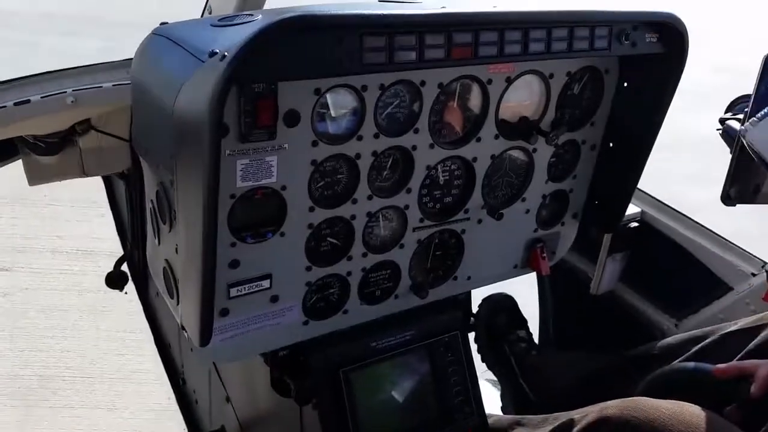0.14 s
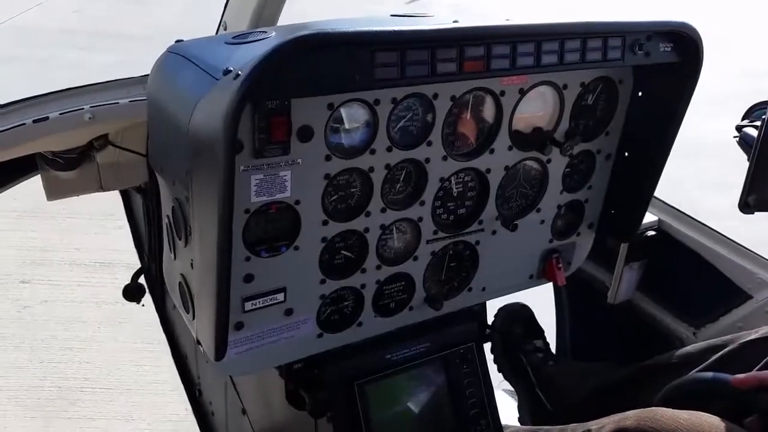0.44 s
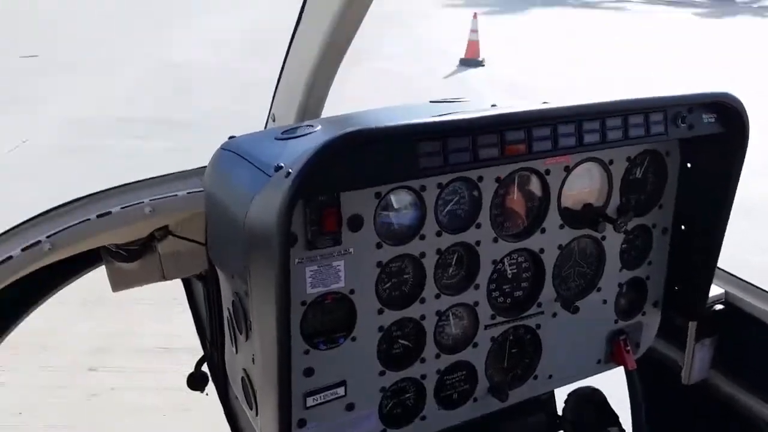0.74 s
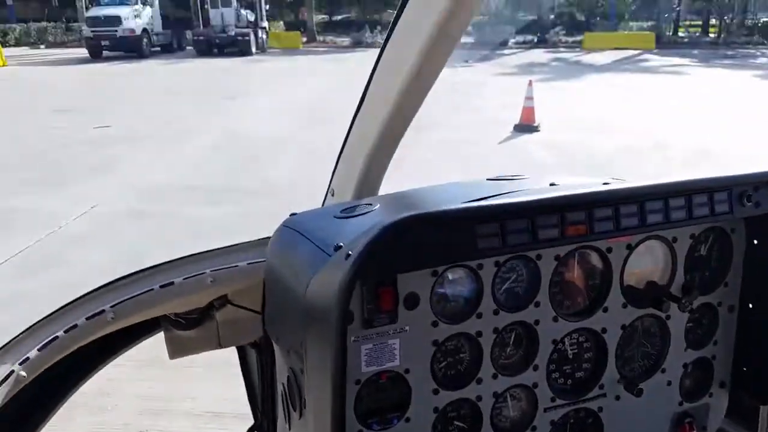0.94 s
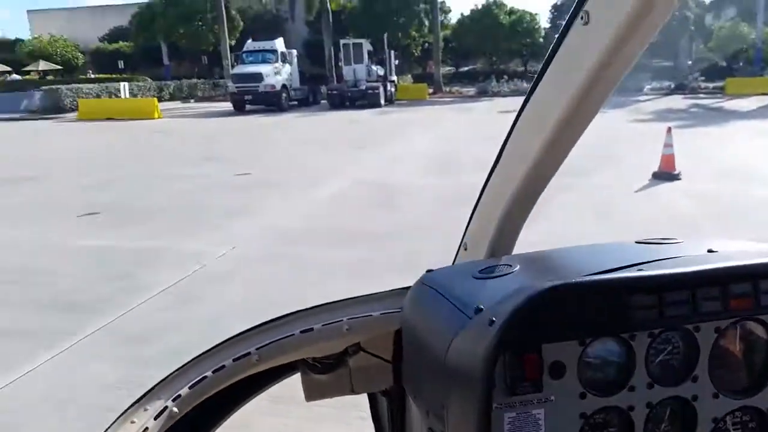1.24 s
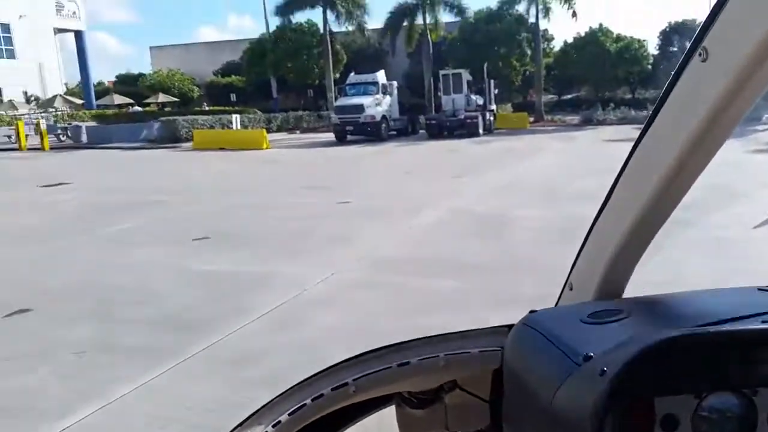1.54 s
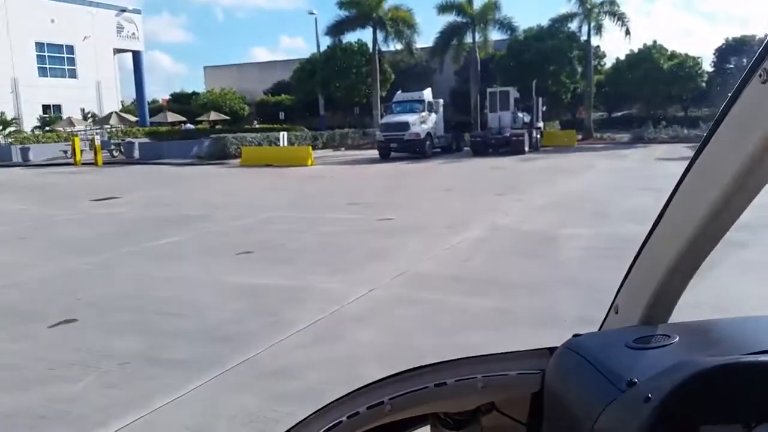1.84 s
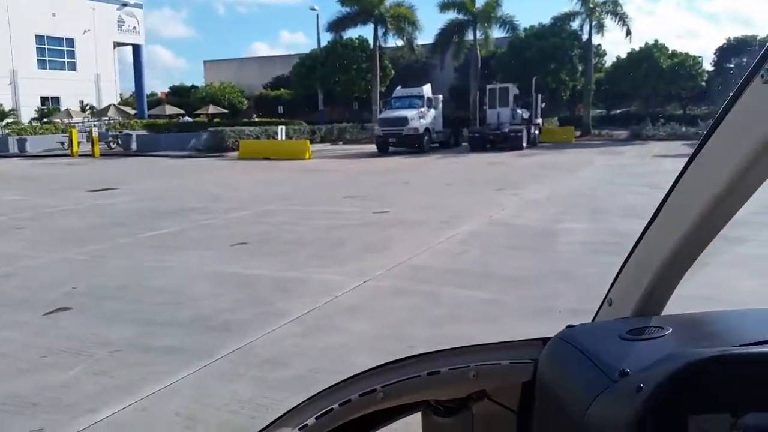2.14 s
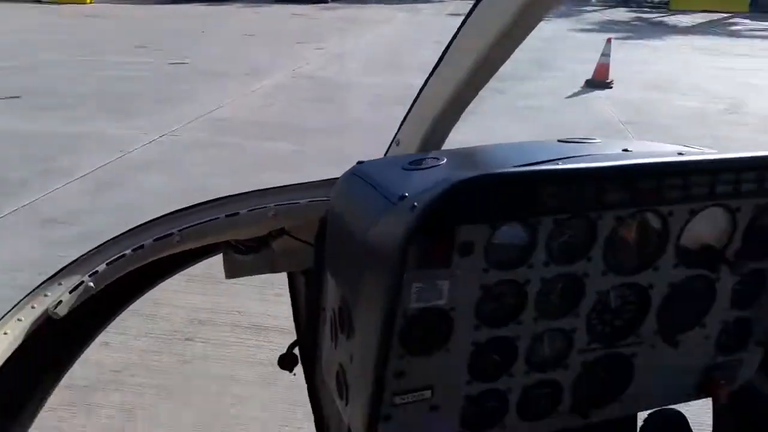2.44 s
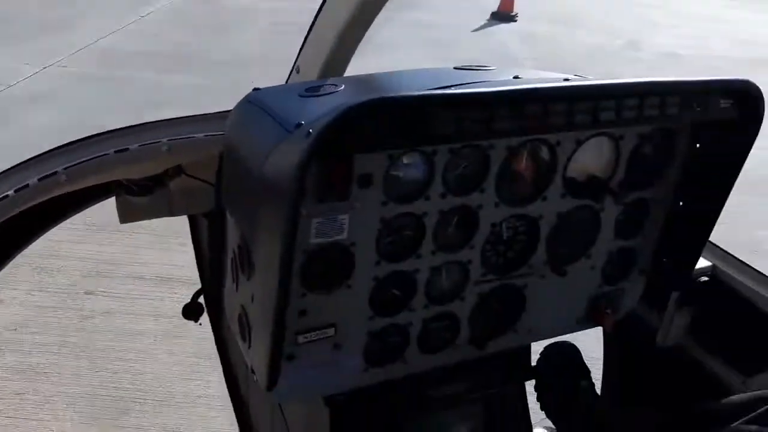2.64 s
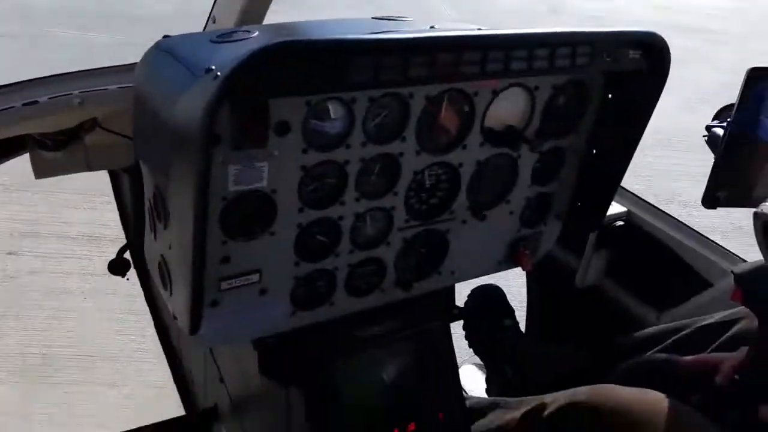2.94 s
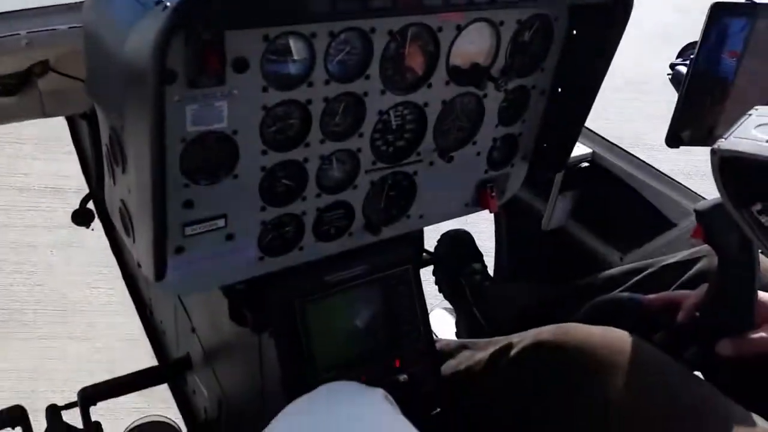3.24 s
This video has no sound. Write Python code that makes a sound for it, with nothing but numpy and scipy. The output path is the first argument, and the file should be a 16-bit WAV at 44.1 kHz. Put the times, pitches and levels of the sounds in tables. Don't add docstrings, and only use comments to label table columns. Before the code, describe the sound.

A turbine helicopter idles on the ground, piercing steady whine over low rumble, heard inside the cockpit

```python
import sys
import numpy as np
from scipy import signal
from scipy.fft import rfft, irfft
from scipy.io import wavfile

SR = 44100
rng = np.random.default_rng(int(sys.argv[2]) if len(sys.argv) > 2 else 0)


def gain_from_decibels(decibels):
    exponent = np.asarray(decibels, float) / 20
    return 10 ** exponent


def to_wav(sig):
    pcm = np.clip(np.atleast_2d(sig), -1, 1) * 32767
    pcm = np.round(pcm).astype(np.int16)
    wavfile.write(sys.argv[1], SR, pcm.T)


N = 149940
T = np.arange(N) / SR
BLADE_PER_S, BLADE_AT_S = 7.68, 0.018


def in_time(rows):
    s, *columns = np.transpose(rows)
    return [np.interp(T, s, column) for column in columns]


def at_hz(points, hz):
    table_hz, table_db = np.array(points).T
    return np.interp(np.log(hz), np.log(table_hz), table_db)


def rms_one(x):
    return x / np.sqrt(np.mean(np.abs(x) ** 2))


def drift(rate_hz):
    step = 64
    r = np.exp(-2 * step * np.pi * rate_hz / SR)
    draw = rng.standard_normal((4, N // step + 1502))
    slow = signal.lfilter([1], [1, -2 * r, r * r], draw)[:, 1500:]
    a, b, c, d = [np.interp(np.arange(N) / step, np.arange(len(v)), rms_one(v)) for v in slow]
    return np.array([a + 1j * b, c + 1j * d]) / np.sqrt(2)


def sine(paths, turns):
    return np.sqrt(2) * (paths * np.exp(2j * np.pi * turns)).real


def tone(turns, fade):
    direct = np.exp(1j * rng.uniform(0, 2 * np.pi))
    paths = (direct + fade * drift(2.5)) / np.sqrt(1 + fade ** 2)
    flutter = 0.3 * min(5 * fade, 1)
    return sine(paths * (1 + flutter * drift(10.0)[0]), turns)


# hz, side_over_mid_db
WIDTH = [(60, -20), (150, -15), (300, -10), (600, -6.5), (1200, 4), (2400, 0.5), (15000, .5)]
# hz, left_over_right_db
LEAN = [(50, -2), (600, 1.5), (1200, 3.7), (3000, -1.5), (4300, -15), (5600, -16.5), (8200, 5), (10500, -3)]


def coloured(shape, patchy_db):
    hz = np.maximum(np.arange(N // 2 + 1) * SR / N, 5)
    half = np.cos(np.pi * np.log2(hz)) ** 2
    side_db = at_hz(WIDTH, hz)
    lean = gain_from_decibels(at_hz(LEAN, hz) * [[0.5], [-0.5]])
    out = 0
    for part, wobble in zip((half, 1 - half), drift(4.8).real):
        mid, side = rfft(rng.standard_normal((2, N)))
        pair = (mid + gain_from_decibels(side_db) * side * [[1], [-1]]) / np.sqrt(1 + gain_from_decibels(2 * side_db))
        out = out + gain_from_decibels(patchy_db * wobble) * irfft(pair * np.sqrt(part) * shape(hz) * lean, N)
    return rms_one(out)


# start_s, left_db, right_db, left_lead_rad
WHINE = [(.1, -18.5, -26, -2.5), (.35, -13.5, -15.6, -3), (.41, -21.5, -17, -0.6), (.6, -9.5, -24, -3),
         (.76, -19.5, -33.4, -2.5), (.92, -14.5, -35, -1.5), (1.1, -9.5, -21.5, -6), (1.35, -13.5, -38, -1),
         (1.55, -11.5, -26.3, -5), (1.68, -12.5, -19, -3), (1.78, -12.5, -39, 3), (2.0, -19, -24, 1),
         (2.2, -14.3, -33, 2), (2.42, -17.5, -23, -3), (2.6, -12.5, -31.9, 1), (2.92, -12.6, -37, -9.5),
         (3.03, -18, -19.3, -2), (3.2, -12, -16.5, -3)]
# start_s, pitch_hz
WHINE_HZ = [(0, 8148.5), (1.75, 8148.5), (2.05, 8142), (2.75, 8142), (3.05, 8145)]
COMPRESSOR_ORDERS = [20, 22, 24, 25, 28]
# left_db, right_db
COMPRESSOR_DB = [
    [-37, -31],
    [-44, -46],
    [-33, -35],
    [-33, -34],
    [-37, -36],
]
HIGH_FADE = 2.2


def compressor():
    left_db, right_db, lead_rad = in_time(WHINE)
    turns = np.cumsum(*in_time(WHINE_HZ)) / SR
    level = gain_from_decibels(np.array([left_db, right_db]))
    flicker = 1 + 0.28 * drift(11.0)
    out = sine(level * np.exp(1j * lead_rad * [[1], [0]]) * flicker, turns)
    for order, db in zip(COMPRESSOR_ORDERS, COMPRESSOR_DB):
        out = out + gain_from_decibels(np.array(db))[:, None] * tone(order / 16 * turns, HIGH_FADE)
    return out


# offset_s from overhead, length_s, blur_hz, left_db, right_db
GLINTS = [
    (-.006, .03, 150, -32, -27.5),
    (.012, .025, 280, -26, -30),
]
# level_db for tip, root
SECOND_BLADE_DB = [-6, 4.5]


def blade_echo():
    out = 0
    for blade in range(2):
        turn = (BLADE_PER_S * (T - BLADE_AT_S) + blade + 1) / 2
        since_s = (turn % 1 - 0.5) * 2 / BLADE_PER_S
        tip_hz = 6230 + 4e5 * since_s ** 2
        root_hz = 7600 - 13000 * since_s
        for hz, second_db, glint in zip((tip_hz, root_hz), SECOND_BLADE_DB, GLINTS):
            offset_s, length_s, blur_hz, left_db, right_db = glint
            level = gain_from_decibels(np.array([[left_db], [right_db]]) + blade * second_db)
            flash = level * np.exp(-0.5 * ((since_s - offset_s) / length_s) ** 2)
            blur = drift(blur_hz) * gain_from_decibels(-1 * drift(9.0).real)
            wandering_hz = hz + 170 * drift(5.1).real
            out = out + sine(flash * blur, np.cumsum(wandering_hz, axis=1) / SR)
    return out


# start_s, level_db
FACING = [(0, -31), (.3, -31), (.6, -33), (1.1, -33), (1.5, -39), (2.4, -37), (2.7, -32.5), (3.2, -31.5),
          (3.4, -36)]


def facing():
    level_db, = in_time(FACING)
    return level_db - level_db.mean()


DRIVE_ORDERS = [1, 15, 17, 19, 21, 25, 26, 29, 30, 34, 38, 50, 166]
DRIVE_DB = [-27, -51, -43, -35.5, -55, -50, -54, -51, -53, -50, -52, -52, -37]
DRIVE_FOLLOWS = [0, .5, -.1, 1, .5, -.3, .5, .3, .3, .3, .7, .3, 0]


def gearbox(facing_db):
    turns = 58.44 * T
    out = 0
    for order, db, share in zip(DRIVE_ORDERS, DRIVE_DB, DRIVE_FOLLOWS):
        fade = np.clip(0.13 * order / 19, 0.03, HIGH_FADE)
        out = out + gain_from_decibels(db + share * facing_db) * tone(order * turns, fade)
    return out


# multiple of the blade rate, level_db
THUMP = [(2, -55), (3, -53), (4, -58), (5, -58), (6, -50), (7, -32.5)]


def rotor():
    passes = BLADE_PER_S * (T - BLADE_AT_S)
    return sum(np.sqrt(2) * gain_from_decibels(db) * np.cos(2 * np.pi * k * passes) for k, db in THUMP)


# start_s, level_db
GUST = [(.1, 1.5), (.6, 0), (1.0, 1), (1.4, -2), (1.8, -.5), (2.2, 1.5), (2.6, 0), (3.0, 1), (3.4, -1)]


def gusts():
    return in_time(GUST)[0]


# pitch_hz, width_hz, level_db
CABIN = [(50.5, 16, -27.5), (125.2, 27.2, -24), (375, 15, -35), (556.6, 65, -36), (755, 47, -39.5),
         (2801, 51, -43.5), (14260, 160, -37)]


def cabin():
    out = 0
    for centre_hz, width_hz, db in CABIN:
        def ring(hz):
            low_cut = 1 + (45 / hz) ** 4
            return 1 / (1 + (2 * (hz - centre_hz) / width_hz) ** 2) / low_cut
        out = out + gain_from_decibels(db) * coloured(ring, patchy_db=-0.5)
    return out


# hz, level_db
RUMBLE = [(30, -10), (45, -6), (80, -9), (150, -3), (310, -2.5), (430, -19), (900, -19), (1300, -19)]
# hz, level_db
ROAR = [(400, 8.5), (900, -3.5), (1400, 0.5), (2400, -2), (3000, 0), (4200, -13), (5300, -14),
        (7000, -11.5)]
# hz, level_db
HISS = [(4500, -18.5), (6000, -12), (8100, 5), (8800, -2.5), (10600, 3), (12500, -1), (13600, -6.5),
        (15000, -10.5)]


def airflow(facing_db, gust_db):
    def within(table):
        return lambda hz: gain_from_decibels(at_hz(table, hz)) * (hz > table[0][0]) * (hz < table[-1][0])

    def shaded_band(hz):
        return np.exp(-2 * ((hz - 3860) / 2100) ** 2)

    rumble = gain_from_decibels(-23.5 + gust_db) * coloured(within(RUMBLE), patchy_db=1.0)
    roar = gain_from_decibels(-30 + 0.21 * facing_db) * coloured(within(ROAR), patchy_db=2.0)
    shaded = gain_from_decibels(-48.5 + 2.7 * facing_db) * coloured(shaded_band, patchy_db=2.5)
    hiss = gain_from_decibels(-20) * coloured(within(HISS), patchy_db=0.5)
    return rumble + roar + shaded + hiss


def scene():
    facing_db, gust_db = facing(), gusts()
    machinery = compressor() + blade_echo() + gearbox(facing_db) + rotor()
    return machinery + gain_from_decibels(gust_db) * cabin() + airflow(facing_db, gust_db)


def roll_off(x):
    return signal.sosfilt(signal.butter(12, 14520, fs=SR, output="sos"), x)


def record(dry):
    unsettled = np.clip(1 - T / 0.16, 0, 1)
    mix = dry * gain_from_decibels(-7 * unsettled)
    return roll_off(mix)


dry = scene()
out = record(dry)
to_wav(out)
```